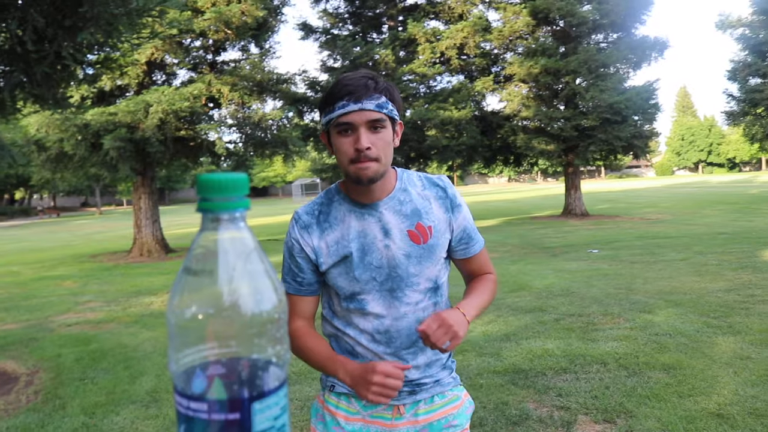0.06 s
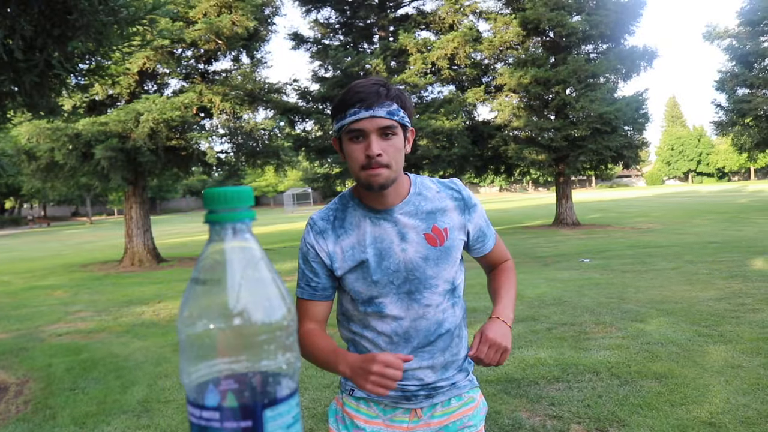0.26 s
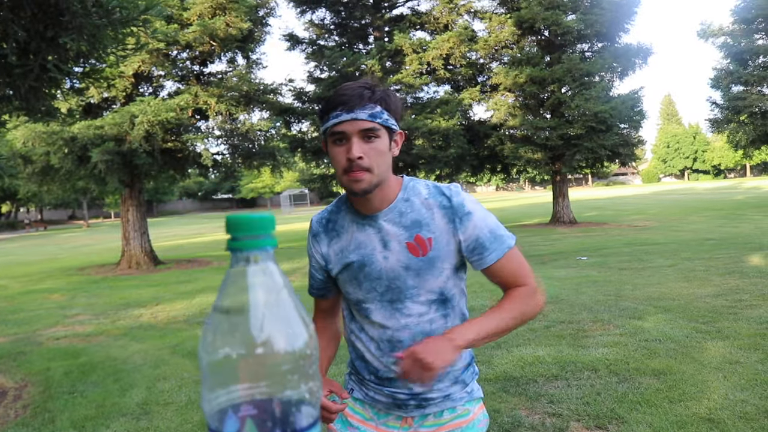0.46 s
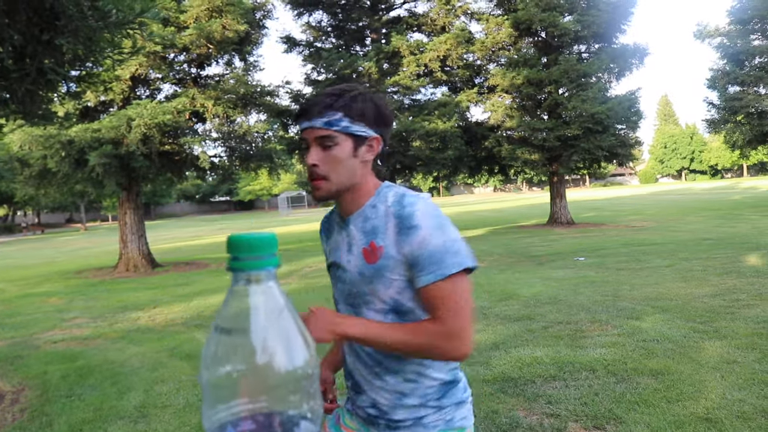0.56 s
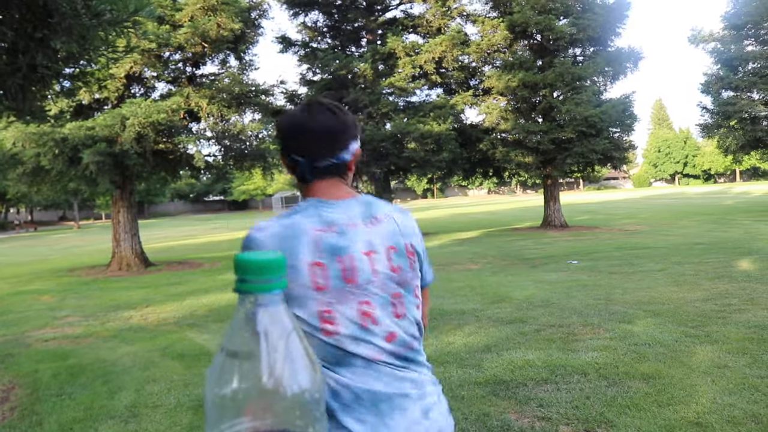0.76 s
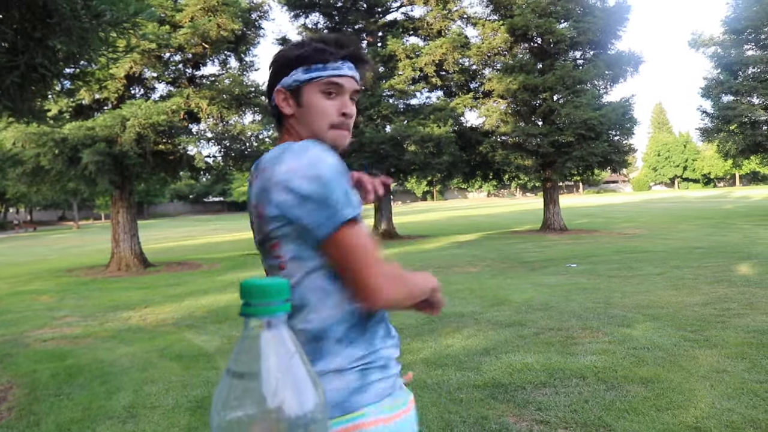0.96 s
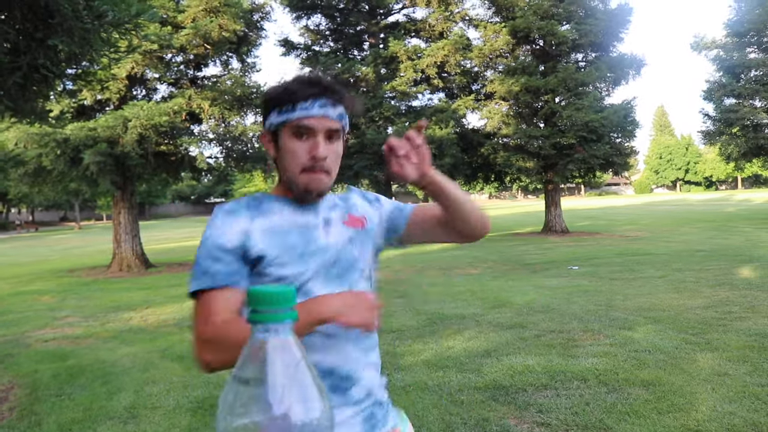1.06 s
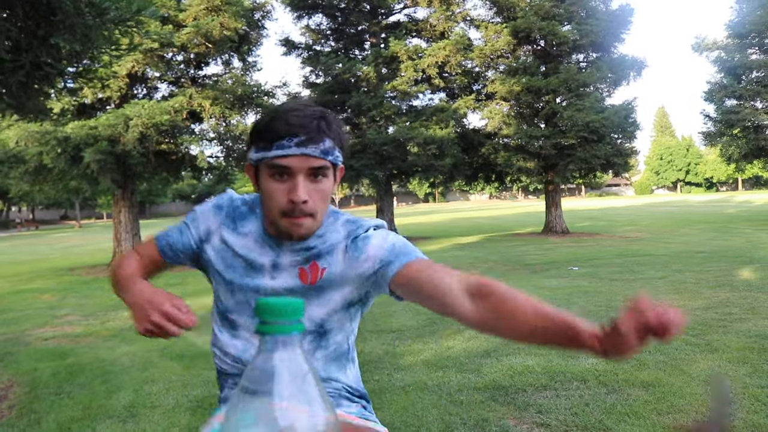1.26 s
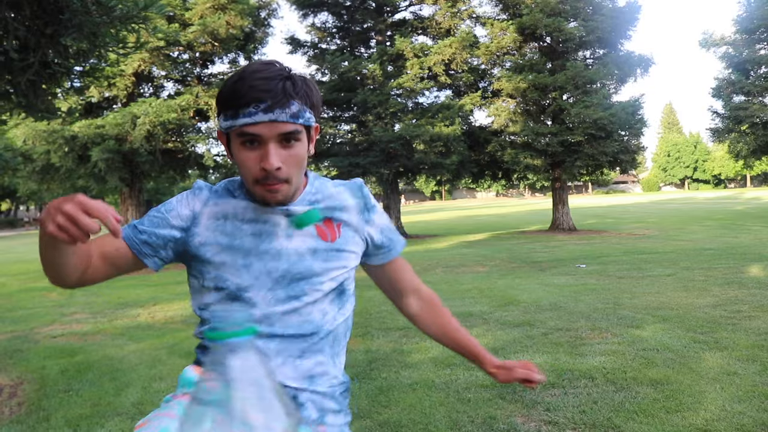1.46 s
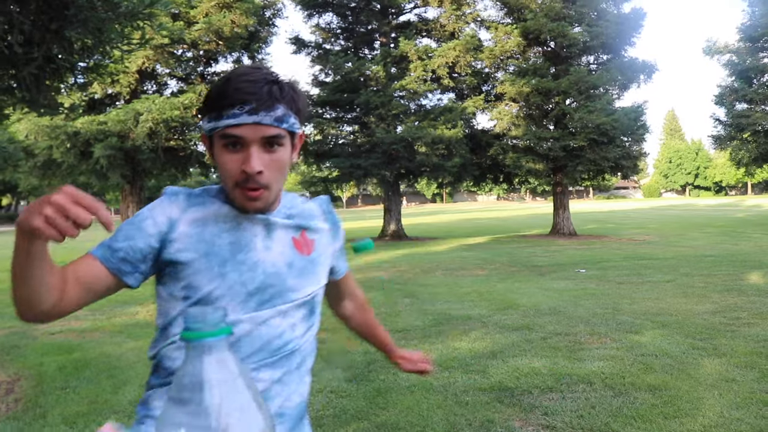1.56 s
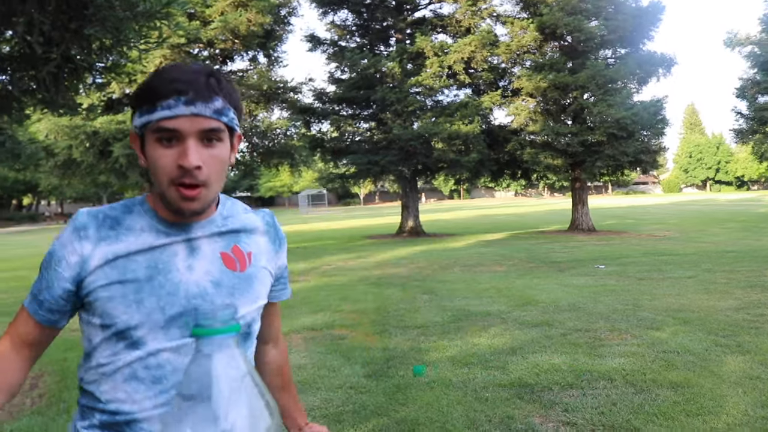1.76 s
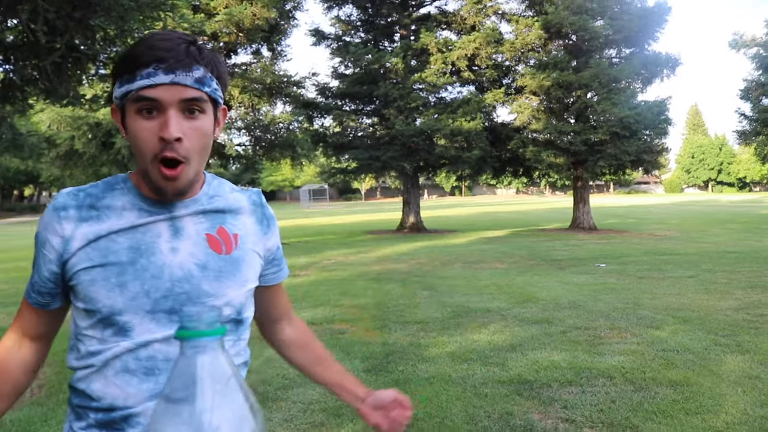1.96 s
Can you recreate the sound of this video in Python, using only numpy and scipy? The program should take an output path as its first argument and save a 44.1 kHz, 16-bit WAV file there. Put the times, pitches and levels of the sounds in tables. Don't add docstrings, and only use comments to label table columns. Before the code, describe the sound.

A plastic bottle cap is hit with a loud, bright crack and rattles faintly; a moment later the bottle gives a tight cluster of hollow knocks. Wind thumps and clothes rustle beforehand, close stereo microphone in an open park.

```python
import sys
import numpy as np
from scipy import signal
from scipy.io import wavfile
from scipy.ndimage import uniform_filter1d

SR = 44100
rng = np.random.default_rng(int(sys.argv[2]) if len(sys.argv) > 2 else 0)


def unload_wav(signal):
    wavfile.write(
        sys.argv[1],
        SR,
        np.round(np.clip(np.atleast_2d(signal).T, -1, 1) * 32767).astype(np.int16),
    )


def convert_level_to_amplitude(level_db):
    exponent = np.asarray(level_db, float) / 20
    return 10 ** exponent


N = 88729

# pitch_hz, level_db (per Hz)
PARK_SPECTRUM = [(130, -22), (230, -11.5), (390, -1), (560, -7.5), (1250, -8), (2000, -22), (5000, -30.5),
                 (8500, -31), (16000, -37)]
# pitch_hz, likeness (1 = same)
PORT_LIKENESS = [(60, 0.6), (240, 1), (950, 0.29), (3770, 0.073), (15000, 0.18)]
# time_s, right_db, left_db
WIND_STRENGTH = [(0, -26, -33), (.04, -21, -33), (.2, -20, -30), (.3, -26.5, -37.5), (.42, -24, -34),
                 (.52, -24, -41.5), (.62, -21, -40.5), (.76, -31, -41), (.89, -24.5, -43),
                 (1.02, -28.5, -41), (1.06, -40.5, -36.5), (1.38, -33.5, -40), (1.5, -55, -53),
                 (1.6, -39, -38), (1.7, -42, -43), (1.8, -35, -34.5), (2.01, -39.5, -39)]
# pitch_hz, level_db (per Hz)
WIND_SPECTRUM = [(20, -12), (48, -1.5), (125, 1), (192, -7.5), (300, -13), (450, -22), (700, -53)]
# start_s, peak_db, pitch_hz
WIND_EDDIES = [(0.048, -14, 156), (0.072, -12, 130), (0.1, -20, 111), (0.14, -18.5, 172),
               (0.182, -11.5, 180), (0.198, -18, 129), (.361, -12, 128), (0.393, -15.5, 104),
               (.443, -18, 172), (.489, -15, 69), (0.591, -18.5, 106), (0.658, -19, 92.5),
               (.868, -21.5, 141), (0.92, -21, 177), (1.008, -20, 168)]
# time_s, level_db, left_minus_right_db
BODY_MOTION = [(0, -64, -8), (.08, -57, 1.5), (.45, -63.5, -3.5), (.6, -50.5, -2.5), (.67, -49, -4.5),
               (.8, -56, -0.5), (.89, -49, -5), (.96, -47.5, -5), (1.02, -53.5, -2), (1.09, -47.5, -5.5),
               (1.18, -52, -3), (1.24, -45.5, -3), (1.3, -53, -2.5), (1.39, -45.5, -1), (1.62, -61, 2),
               (1.69, -48.5, 1.5), (1.89, -48.5, -2.5), (2.01, -64, -5)]
# pitch_hz, level_db (per Hz)
RUSTLE_SPECTRUM = [(900, 1), (1500, -3), (2500, 3), (3900, -4), (5350, -9.5), (8660, -3.5), (12000, -10.5),
                   (16000, -9.5)]
# start_s, peak_db, left_minus_right_db, pitch_hz, width_octaves
CLOTH_SNAPS = [(.2626, -37, -3, 6000, 1.8), (0.2708, -30, -6, 5200, 1.6), (.2742, -31.5, -8, 11500, 0.8),
               (0.4412, -43, -6, 2400, 0.33), (.634, -24.5, 5, 1100, 0.78), (.8774, -42, -9, 7000, 1.5),
               (.975, -36, -2, 3000, 1.4), (1.1553, -31, -2, 950, 0.5), (1.222, -36, 0, 6060, 0.33),
               (1.3542, -29.5, -1, 2200, .8), (1.802, -26, 4, 1350, .25), (1.841, -54, 0, 3500, 1.4)]
# middle_s, length_s, level_db, pitch_hz, width_octaves
ARM_SWINGS = [
    (.665, .09, -41, 2700, 1.2),
    (.78, .3, -50, 1300, .4),
    (1.57, .14, -44, 600, 1.3),
    (1.9, .16, -50, 9000, .8),
    (.06, .2, -40, 420, 1.0),
]
# pitch_hz, level_db, t60_s
CAP_MODES = [(700, -8, 0.03), (910, -5, 0.035), (1135, -4, 0.044), (1560, -2, 0.012), (1920, -7, .025),
             (2235, -1, 0.04), (2480, -4, 0.025), (2750, -2, 0.025), (3120, 0.5, 0.036),
             (3440, -1.5, 0.036), (5100, -11, 0.012), (6400, -8, .010), (7750, -8, 0.012),
             (8800, -12, 0.012)]
# start_s, level_db, left_minus_right_db
BLOW_CONTACTS = [(1.4058, -27, -2), (1.4075, -3, -2), (1.4084, 6, -2), (1.4104, -9, -1), (1.4118, -10, -1),
                 (1.4135, -12, -2), (1.416, -9.5, -3), (1.4205, -9, -3), (1.4228, -13, -3),
                 (1.427, -14, -2), (1.4295, -15, -2)]
# start_s, level_db, left_minus_right_db
THREAD_RATTLE = [(1.4870, -26, 1), (1.4911, -33, -5), (1.5436, -33, 0), (1.5473, -28, 0),
                 (1.552, -36.5, -12), (1.586, -33, 1), (1.5935, -32, -6), (1.598, -33.5, 0),
                 (1.6420, -33, -4)]
# pitch_hz, level_db, t60_s
BOTTLE_MODES = [(392, 0, .017), (520, -5, .007), (800, -14, .007), (980, -7, .009), (1300, -9, .007),
                (1800, -14, .008)]
# start_s, push_db, softness_ms, tick_db, tick_pitch_hz
WALL_KNOCKS = [
    (1.4075, -12, 0.4, -10, 2500),
    (1.6885, -26.5, 0.24, -27, 1910),
    (1.6986, -9, 0.2, -24, 7000),
    (1.6994, -12, 0.3, -14, 1750),
    (1.7044, -26, 1.0, -36, 1290),
    (1.7110, -14.5, 0.77, -27, 7640),
    (1.7123, 8, 0.62, -22, 7500),
    (1.7240, 0, 1.3, -10, 9400),
    (1.7237, -15, .2, -21, 3000),
    (1.4080, -3, .4, -10, 3000),
]
DENTS_IN = (0, 2, 5)


def rms_one(x):
    return x / np.sqrt(np.mean(x ** 2) + 1e-20)


def in_time(rows):
    s, *columns = np.transpose(rows)
    return [np.interp(np.arange(N) / SR, s, column) for column in columns]


def at_hz(points, hz):
    point_hz, value = np.transpose(points)
    return np.interp(np.log(hz), np.log(point_hz), value)


def band_pass(x, low_hz, high_hz):
    return signal.sosfilt(signal.butter(2, [low_hz, high_hz], "band", fs=SR, output="sos"), x)


def high_pass(x, low_hz):
    return signal.sosfilt(signal.butter(2, low_hz, "high", fs=SR, output="sos"), x)


def drift(rate_hz):
    r = np.exp(-2 * np.pi * rate_hz * 40 / SR)
    slow = signal.lfilter([1], [1, -2 * r, r * r], rng.standard_normal(N // 40 + 2002))
    slow = slow[2000:]
    return np.interp(np.arange(N) / 40, np.arange(len(slow)), rms_one(slow))


def ring(clicks, hz, t60):
    r, w = convert_level_to_amplitude(-60 / (t60 * SR)), 2 * np.pi * hz / SR
    return signal.lfilter([0, np.sin(w)], [1, -2 * r * np.cos(w), r * r], clicks + 1e-18)


def add(out, s, sound, pan_db):
    i = int(s * SR)
    sound = np.atleast_2d(sound)[:, :N - i]
    out[:, i:i + sound.shape[1]] += sound * convert_level_to_amplitude(np.array([[pan_db / 2], [-pan_db / 2]]))


def puff(hz, t60, alike, octaves=1.33):
    t = np.arange(3000) / SR
    mid, side = rng.standard_normal((2, len(t))) * convert_level_to_amplitude(-60 * t / t60)
    pair = mid + (1 - alike) * side * np.array([[1], [-1]])
    burst = band_pass(pair, hz / 2 ** (octaves / 2), min(hz * 2 ** (octaves / 2), 17000))
    return burst * np.sqrt(SR / 2 / hz / octaves) * 0.67


def banded_noise(spectrum, shared_db, own_db, rate, alike_share):
    out, together = 0, drift(rate)
    edges = 20 * 2 ** np.arange(0, 10, .5)
    white = rng.standard_normal((2, 2, N + 4000))
    for k, (low, high) in enumerate(zip(edges, edges[1:])):
        hz = np.sqrt(low * high)
        if not spectrum[0][0] * .7 < hz < spectrum[-1][0] * 1.2:
            continue
        mid, side = band_pass(white[k % 2], low, high)[:, -N:]
        alike = np.clip(alike_share * at_hz(PORT_LIKENESS, hz), -.98, .98)
        gain = convert_level_to_amplitude(at_hz(spectrum, hz) + shared_db * together + own_db * drift(rate * 1.64))
        out = out + gain * (np.sqrt(1 + alike) * mid + np.sqrt(1 - alike) * side * [[1], [-1]])
    return rms_one(out)


def park():
    return convert_level_to_amplitude(-41) * banded_noise(PARK_SPECTRUM, shared_db=2.94, own_db=2.0, rate=4.2, alike_share=0.7)


def wind():
    eddy_cycles, eddy_trim_db, eddy_leak_db = 2.06, 6, -18
    right_db, left_db = in_time(WIND_STRENGTH)
    out = banded_noise(WIND_SPECTRUM, shared_db=1.5, own_db=2.5, rate=38.5, alike_share=1.34)
    out = out * convert_level_to_amplitude(np.array([left_db, right_db]) - 2)
    for s, db, hz in WIND_EDDIES:
        t = np.arange(int(SR / hz * eddy_cycles * .5)) / SR
        thump = np.hanning(len(t)) * np.sin(2 * np.pi * hz * t * (1.3 - 0.53 * t / t[-1]))
        add(out, s, convert_level_to_amplitude(db + eddy_trim_db) * thump * convert_level_to_amplitude(np.array([[eddy_leak_db], [0]])), 0)
    return out


def rustle():
    trim_db, snap_cycles = 5.5, 27
    level_db, pan_db = in_time(BODY_MOTION)
    out = banded_noise(RUSTLE_SPECTRUM, shared_db=1.03, own_db=1.95, rate=34, alike_share=1.94)
    out = out * convert_level_to_amplitude(level_db + trim_db + np.array([pan_db, -pan_db]) / 2)
    for s, db, pan_db, hz, octaves in CLOTH_SNAPS:
        snap = puff(hz, 0.003 + snap_cycles / hz, alike=0.55, octaves=octaves)
        add(out, s, convert_level_to_amplitude(db) * snap, pan_db)
    return out


def swishes():
    out = np.zeros((2, N))
    for s, length, db, hz, octaves in ARM_SWINGS:
        swell = np.cos(np.pi * np.clip((np.arange(N) / SR - s) / length, -.5, .5)) ** 2
        mid, side = rng.standard_normal((2, N))
        pair = mid + .6 * side * np.array([[1], [-1]])
        air = rms_one(band_pass(pair, hz / 2 ** (octaves / 2), hz * 2 ** (octaves / 2)))
        out += convert_level_to_amplitude(db + 1.5 * drift(40)) * swell * air
    return out


def cap_ring(click):
    spread_db, side_spread_db, damping = 2.5, 2.6, 0.39
    uneven_db = rng.normal(0, 1, (len(CAP_MODES), 1, 1)) * spread_db
    uneven_db = uneven_db + rng.normal(0, 1, (len(CAP_MODES), 2, 1)) * side_spread_db
    sound = 0
    for m, (hz, level_db, t60) in enumerate(CAP_MODES):
        sound = sound + convert_level_to_amplitude(level_db + uneven_db[m]) * (-1) ** m * ring(click, hz, t60 * damping)
    return sound


def cap():
    crack_db, late_crack_db = -9, -8
    shake_db, shake_t60_s = -11.5, 0.095
    out, click = np.zeros((2, N)), np.eye(1, 3000)[0]
    for k, (s, db, pan_db) in enumerate(BLOW_CONTACTS + THREAD_RATTLE):
        sound = cap_ring(click)
        if k >= len(BLOW_CONTACTS):
            sound = high_pass(sound, 1800) + convert_level_to_amplitude(1) * puff(3300, 0.032, alike=0.3, octaves=.8)
        crack = convert_level_to_amplitude(db + crack_db + late_crack_db * (k > 3)) * puff(7800, 0.006, alike=0.075)
        add(out, s, convert_level_to_amplitude(db - 8.5) * sound + crack, pan_db)
    first_s, second_s = BLOW_CONTACTS[1][0], BLOW_CONTACTS[2][0]
    add(out, first_s, convert_level_to_amplitude(-0.5) * ring(click, 720, .010), 1.5)
    add(out, second_s, convert_level_to_amplitude(-10) * ring(click, 255, .022), 0)
    shiver = puff(2900, shake_t60_s, alike=0.6, octaves=1.1)
    shiver = shiver + convert_level_to_amplitude(-10) * puff(8500, shake_t60_s * 0.46, alike=0.46)
    add(out, first_s, convert_level_to_amplitude(shake_db) * shiver, -2)
    return out


def scuff():
    length_s, level_db = 0.081, -33
    swell = np.sin(np.pi * np.arange(3000) / SR / length_s)
    friction = puff(1130, 1.0, alike=0.3)
    friction = friction + convert_level_to_amplitude(-8) * puff(6700, 0.82, alike=0.37)
    friction = friction + convert_level_to_amplitude(2) * puff(390, 1.0, alike=0.35, octaves=0.93)
    return convert_level_to_amplitude(level_db) * swell * friction


def bottle():
    tick_cycles, tick_octaves, tick_noise_db = 14, .8, -5
    out = np.zeros((2, N))
    for k, (s, db, soft_ms, tick_db, tick_hz) in enumerate(WALL_KNOCKS):
        t = np.arange(3000) / SR * 1000 / soft_ms
        push = np.sin(np.pi * np.minimum(t, 1)) ** 2
        push = push / push.sum()
        hollow = 0
        for m, (hz, level_db, t60) in enumerate(BOTTLE_MODES):
            hollow = hollow + convert_level_to_amplitude(level_db) * ring(push, hz, t60) * (-1) ** (m // 2)
        t60 = .002 + tick_cycles / tick_hz
        tick = ring(t == 0, tick_hz, t60)
        tick = tick + convert_level_to_amplitude(tick_noise_db) * puff(tick_hz, t60, alike=0.29, octaves=tick_octaves)
        sign = 1 if k in DENTS_IN else -1
        add(out, s, sign * convert_level_to_amplitude(db) * hollow + convert_level_to_amplitude(tick_db) * tick, 1.0)
    add(out, 1.671, scuff(), 0)
    return high_pass(out, 210)


def scene():
    return park() + wind() + rustle() + swishes() + cap() + bottle()


def roll_off(x):
    return signal.sosfilt(signal.butter(12, 16320, fs=SR, output="sos"), x)


def record(dry):
    knee_db, share, release_db_per_s, attack_s = -24, 0.6, 185, 0.019
    clip_hardness = 27
    power = uniform_filter1d((dry ** 2).mean(axis=0), size=400)
    over_db = np.maximum(10 * np.log10(power + 1e-12) - knee_db, 0) * share
    ramp = release_db_per_s * np.arange(N) / SR
    held_db = np.maximum.accumulate(over_db + ramp) - ramp
    r = np.exp(-1 / (attack_s * SR))
    x = dry * convert_level_to_amplitude(-signal.lfilter([1 - r], [1, -r], held_db))
    x = x / (1 + np.abs(x) ** clip_hardness) ** (1 / clip_hardness)
    x = signal.sosfilt(signal.cheby2(14, 40, 16200, fs=SR, output="sos"), x)
    return roll_off(x)


dry = scene()
out = record(dry)
unload_wav(out)
```